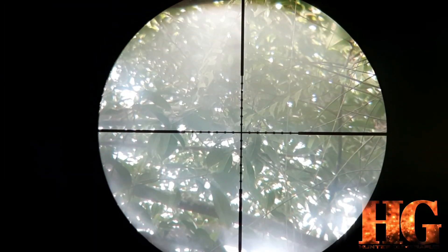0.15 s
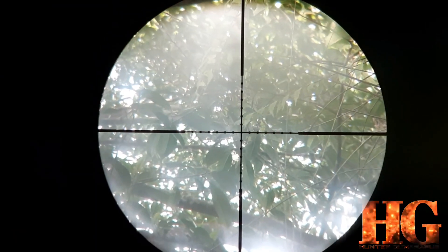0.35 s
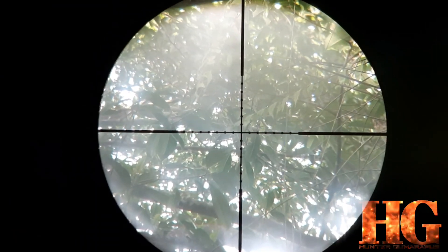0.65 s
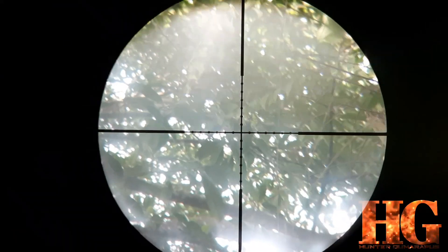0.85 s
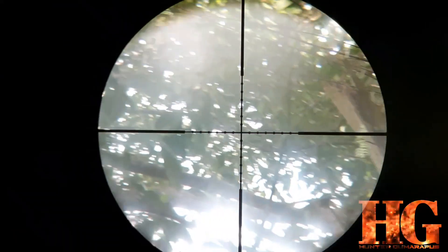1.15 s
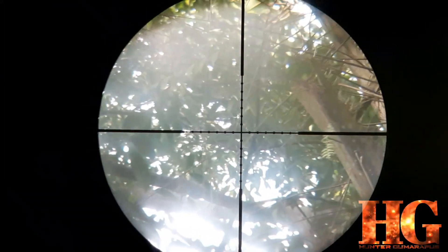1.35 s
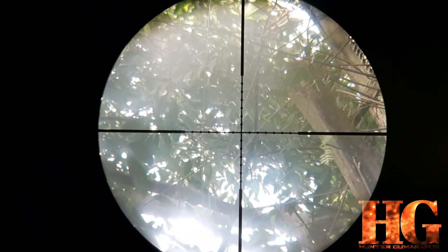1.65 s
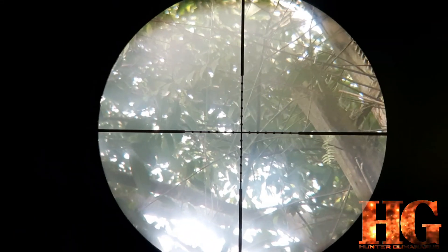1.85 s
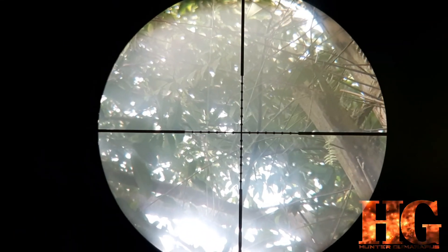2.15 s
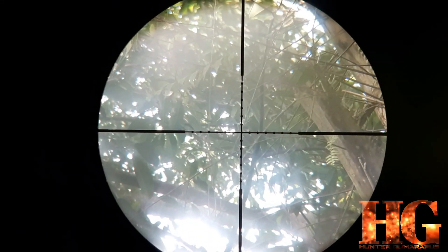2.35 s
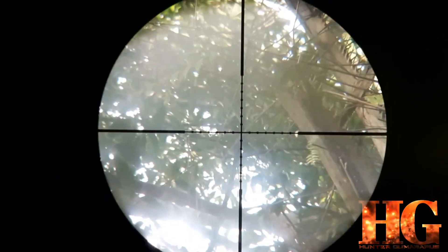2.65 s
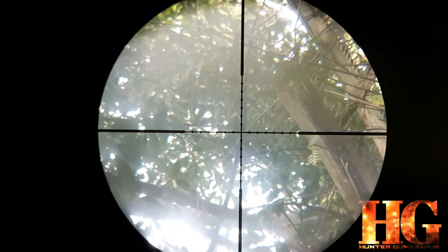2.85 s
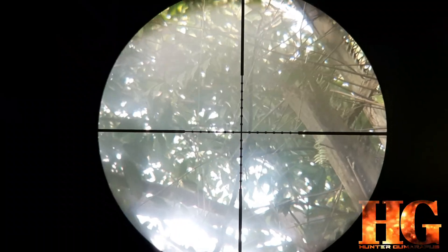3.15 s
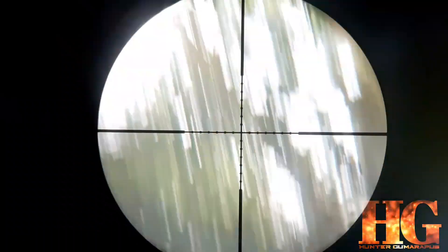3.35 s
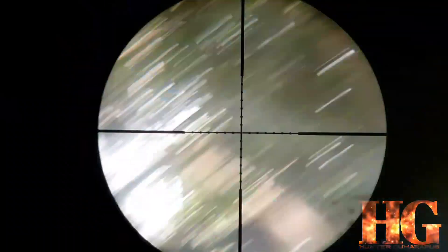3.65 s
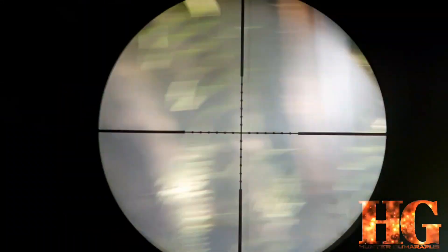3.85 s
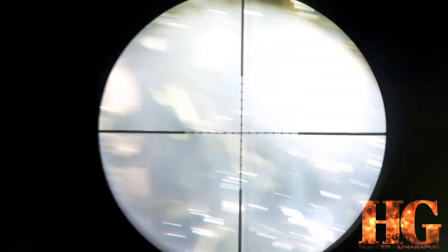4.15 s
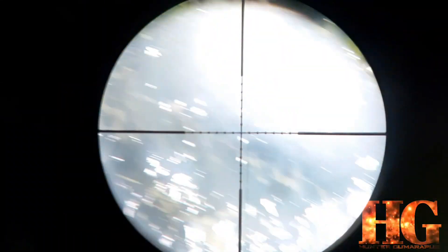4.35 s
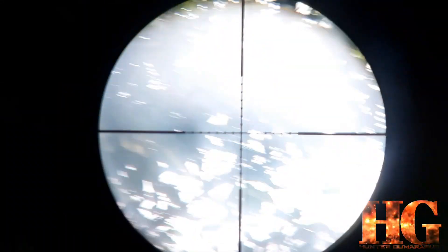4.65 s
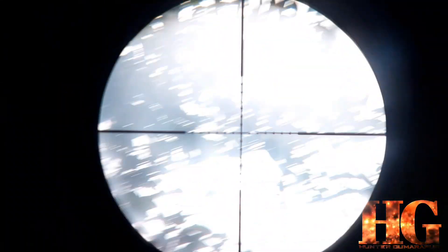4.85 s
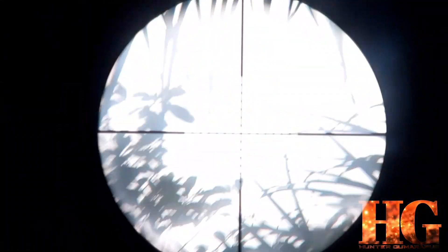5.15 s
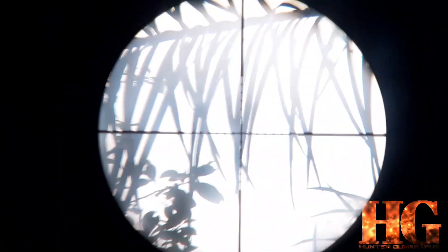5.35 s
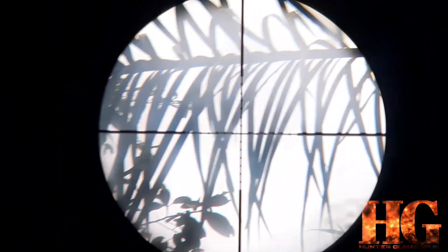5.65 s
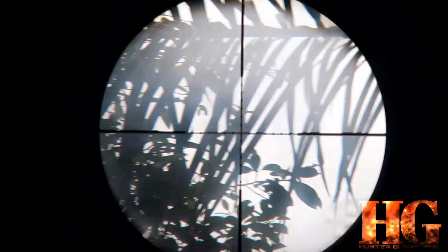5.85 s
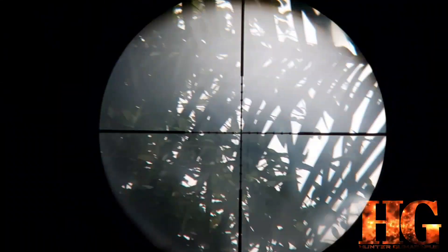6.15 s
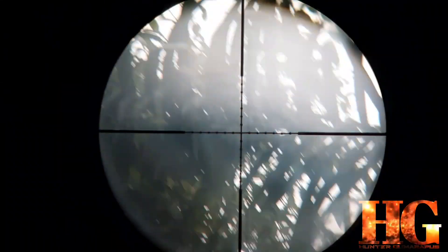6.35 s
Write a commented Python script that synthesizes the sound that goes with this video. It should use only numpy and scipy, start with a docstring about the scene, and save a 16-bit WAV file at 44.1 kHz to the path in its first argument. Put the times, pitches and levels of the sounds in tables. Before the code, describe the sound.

In breezy woods with droning insects and a whistling bird, an air rifle thumps, echoes through trees, then clatters as it is recocked.

```python
"""Insects drone and small birds call in a breezy wood; an air rifle thumps, echoes, then clatters as it is recocked.
A two-port microphone rides on the gun: the right port faces the action, the left lies in its shadow.
Air, insects and rubbing are shaped noise; birds are gliding tones; metal and wood are clicks that set modes ringing.
The shot is a noise blast with ringing parts, slow tube tones and a decaying noise echo.
The recorder turns its gain down on heavy bass, such as the jolt of the shot, and creeps back up."""
import sys
import numpy as np
from scipy import signal
from scipy.fft import rfft, irfft
from scipy.io import wavfile
from scipy.ndimage import uniform_filter1d

SR = 44100
rng = np.random.default_rng(int(sys.argv[2]) if len(sys.argv) > 2 else 0)


def wrap_up_sound(samples):
    """Save the sound to the file named by the first command line argument, as 16-bit audio."""
    columns = np.atleast_2d(samples).T
    # keep every value between -1 and 1, then stretch to whole-number steps
    tamed = np.clip(columns, -1, 1)
    steps = np.round(tamed * 32767).astype(np.int16)
    wavfile.write(sys.argv[1], SR, steps)


N = 287091
TIME = np.arange(N) / SR  # seconds
PORT_LAG = 21  # samples between the ports

# hammer on the valve and its bounces: (time [s], level [dB])
HAMMER = [(2.5715, -2), (2.5774, -11), (2.584, -14), (2.5885, -24)]


def amp(db):
    """Turn a level in dB into a gain."""
    return 10 ** (np.asarray(db) / 20)


def rms_one(x):
    """Scale to an average strength (rms) of 1."""
    return x / np.sqrt(np.mean(x ** 2) + 1e-20)


def curve(rows, column=1):
    """Join the points of a table column by straight lines along time."""
    points = np.array(rows)
    return np.interp(TIME, points[:, 0], points[:, column])


def at_bins(rows, column=1):
    """Spread a table column over the FFT bins, on a log-frequency axis."""
    hz = np.fft.rfftfreq(N, 1 / SR) + 1  # the 1 avoids log(0)
    points = np.array(rows)
    return np.interp(np.log(hz), np.log(points[:, 0]), points[:, column])


def noise(colour, channels=1):
    """Shape white noise to a given spectrum, at rms 1."""
    spectrum = rfft(rng.standard_normal((channels, N)))
    return rms_one(irfft(spectrum * amp(at_bins(colour)), N))


def drift(rate):
    """Wander at random through `rate` new values a second, each drawn with spread 1."""
    knots = rng.standard_normal(400)
    return np.interp(TIME * rate, np.arange(400), knots)


def swells(rows):
    """Add up envelopes that rise, hold and fall."""
    edge_db = 40  # range that a swell climbs and falls
    total = np.zeros(N)
    for start_s, rise, hold, fall, db in rows:
        times = start_s + np.cumsum([0, abs(rise), abs(hold), abs(fall)])
        levels = db - edge_db * np.array([1, 0, 0, 1])
        total += amp(np.interp(TIME, times, levels, left=-200, right=-200))
    return total


def ring(x, hz, t60):
    """A unit click sets a sine of height about 1 ringing; it dies by 60 dB in t60 seconds."""
    r = amp(-60 / (max(t60, .001) * SR))  # loss per sample
    w = 2 * np.pi * hz / SR
    return signal.lfilter([0, np.sin(w)], [1, -2 * r * np.cos(w), r * r], x + 1e-18)


def dying(start_s, db, t60, rise_s):
    """Envelope that rises smoothly from silence and dies away."""
    t = np.maximum(TIME - start_s, 0)
    return amp(db - 60 * t / t60) * (1 - np.exp(-t / rise_s))


def near(x, left_db=-3., cavity_db=-30., scatter_db=-6.):
    """A source on the gun: direct at the right port; at the left late, dull, scattered and with a cavity ring."""
    late = np.concatenate([np.zeros(PORT_LAG), x[:-PORT_LAG]])
    # ways round the shooter and the scope
    paths = rng.standard_normal((2, 800)) * amp(-60 * TIME[:800] / .025)
    first, second = (np.convolve(late, path / np.sqrt(np.sum(path ** 2)))[:N] for path in paths)
    turn = 2 * drift(40)  # the mix of paths wanders as the gun moves
    both = late + amp(scatter_db) * (np.cos(turn) * first + np.sin(turn) * second)
    shaded = signal.lfilter(*signal.butter(1, 1500, fs=SR), both) + amp(-19.0) * both
    left = signal.lfilter(*signal.iirnotch(8700, 2.6, SR), amp(left_db) * shaded)
    cavity = amp(cavity_db) * ring(late, 1080, 0.016)
    return np.array([left + cavity, x])


def breeze_air():
    """Air noise, partly alike at the two ports, whose rumble and leaf hiss swell with the breeze."""
    # steady air: (frequency [Hz], left [dB per Hz], right [dB per Hz], left-right likeness [-1 to 1])
    air_spectrum = [(29, -105, -104, 0.99), (62.3, -92.5, -94, 0.73), (130, -81.5, -78, 1),
                    (130, -83.5, -81, 1), (211, -96.5, -94, 0.47), (290, -95, -92, 0.76),
                    (461, -103, -101, -0.1), (820, -99, -94.5, 0.043), (1240, -101, -101, -0.54),
                    (1720, -108, -103, 0.5), (3000, -107, -103, -0.26), (6100, -121, -109, 0.45),
                    (15000, -124, -119, 0.47)]
    # breeze: (time [s], rumble swell [dB], leaf hiss swell [dB])
    breeze = [(0, 0.5, -1), (.3, -5.5, -1.5), (.6, 3.5, 0), (2.4, 4.5, -0.5), (3.5, 4, 2), (4.4, 6.5, 1),
              (4.8, 9.5, 2.5), (5.5, 3.5, 3.5), (6.2, 4.5, 0.5), (6.51, -2.5, -6)]
    common, apart = rfft(rng.standard_normal((2, N)))
    alike = np.clip(at_bins(air_spectrum, column=3), -1, 1)
    pair = np.sqrt(1 + alike) * common + np.sqrt(1 - alike) * apart * [[1], [-1]]
    pair = pair * np.sqrt(SR / 4)  # makes the table levels hold per Hz
    levels_db = [at_bins(air_spectrum, column=1), at_bins(air_spectrum, column=2)]
    air = irfft(pair * amp(levels_db), N)
    rumble = signal.sosfilt(signal.butter(2, 380, fs=SR, output="sos"), air)
    leaves = air - rumble
    rumble_gain = amp(curve(breeze) + 2.5 * drift(14))
    leaf_gain = amp(curve(breeze, column=2) + .8 * drift(9))
    return rumble * rumble_gain + leaves * leaf_gain


def insects():
    """Insects drone as narrow bands of noise that waver slightly in level."""
    # drones: (centre [Hz], width [Hz], left level [dB], right level [dB])
    drones = [(4604, 510, -73.5, -73.5), (7550, 600, -88.5, -66.5), (8900, 610, -99.5, -79),
              (10700, 1900, -85, -80)]
    out = np.zeros((2, N))
    for hz, width_hz, left_db, right_db in drones:
        edges = [hz - width_hz / 2, hz + width_hz / 2]
        band = signal.butter(2, edges, "band", fs=SR, output="sos")
        drone = rms_one(signal.sosfilt(band, rng.standard_normal((2, N))))
        out += drone * amp([[left_db], [right_db]]) * amp(0.76 * drift(28))
    return out


def rubbing():
    """The stock drags through the hands as the aim moves: coloured noise with an uneven level."""
    # drags: (time [s], rise [s], hold [s], fall [s], level [dB])
    drags = [(.4, 0.28, .3, .1, -66.5), (.95, 0.16, 0.21, 0.46, -65.5), (3.4, 0.068, 0.447, 0.043, -54.5)]
    # colour: (frequency [Hz], relative level [dB per Hz])
    rub_colour = [(150, -12), (300, -2), (680, -7), (810, 4), (940, -2), (1200, -3), (1350, -16),
                  (8000, -35)]
    return noise(rub_colour, channels=2) * swells(drags) * amp(3.0 * drift(24.05))


def birds(t60=0.72):
    """Birds whistle gliding tones; the trees smear each into a tail."""
    # three-note phrase: (time from last note [s], length [s], from [Hz], to [Hz], relative level [dB])
    phrase = [(-.164, .027, 2550, 2908, -11), (-.036, .024, 3072, 3312, -4.5), (0, .052, 4600, 3690, 0)]
    # phrases: (time of last note [s], level [dB], extra level of opening note [dB])
    phrases = [(0.876, -55, 7), (1.359, -58, 8), (1.85, -59.5, 10.5), (2.42, -58, 5), (2.985, -61, -1),
               (3.589, -57.5, -15), (4.43, -57, 3), (5.437, -59, 0)]
    # other birds: (time [s], length [s], from [Hz], to [Hz], level [dB])
    chirps = [(4.207, 0.03, 2150, 2025, -63), (5.046, 0.078, 5400, 5480, -77),
              (5.296, 0.04, 5540, 5500, -68), (6.422, 0.0275, 2800, 1930, -67.5),
              (6.475, 0.032, 2020, 3000, -65.5)]
    notes = list(chirps)
    for s, level, opening in phrases:
        for k, (at, length, from_hz, to_hz, db) in enumerate(phrase):
            notes.append((s + at, length, from_hz, to_hz, db + level + opening * (k == 0)))
    dry = np.zeros(N + SR)
    for s, length, from_hz, to_hz, db in notes:
        u = np.linspace(0, 1, int(length * SR))  # progress through the note
        hz = to_hz + (from_hz - to_hz) * (1 - u) ** 2.8  # the glide levels off
        husk_db = np.interp(u, np.linspace(0, 1, 16), rng.normal(0, 3, 16))  # husky flutter
        waver = np.interp(u, np.linspace(0, 1, 8), rng.normal(0, .012, 8))
        hz *= rng.normal(1, .006) + waver  # no two notes alike
        envelope = amp(db + husk_db) * np.sqrt(np.sin(np.pi * u ** .7))
        dry[int(s * SR):][:len(u)] += envelope * np.sin(2 * np.pi * np.cumsum(hz) / SR)
    t = TIME[:SR // 2]
    trees = rng.standard_normal((2, len(t))) * amp(-60 * t / t60)
    trees = trees / np.sqrt(np.sum(trees ** 2, axis=1, keepdims=True))
    tail = signal.fftconvolve(dry[None, :N], trees)[:, :N]
    # moving leaves blur the pitch of the tail
    flutter = rms_one(uniform_filter1d(rng.standard_normal((2, N)), 150))
    return dry[:N] + amp(2.5) * tail * (.87 + .5 * flutter)


def knocks():
    """Soft blows set the stock ringing dully, felt at both ports."""
    # blows: (time [s], level [dB], contact cut-off [Hz])
    blows = [(1.617, -47, 380), (2.767, -54, 500), (3.332, -42, 1500), (3.472, -41, 400),
             (4.712, -39.5, 1386), (5.233, -38.5, 1390), (5.295, -32, 1400), (5.459, -43.5, 1405),
             (5.644, -45.5, 1400), (5.719, -42, 1400), (5.833, -40, 1430)]
    # stock modes: (frequency [Hz], level [dB], t60 [s])
    stock = [(164, -17, 0.1), (301.4, -2.5, 0.1), (418, -0.5, 0.029), (600, -11.5, 0.016), (990, 5, 0.023)]
    out, click = np.zeros(N + SR), np.eye(1, SR // 6)[0]
    for s, db, cut_hz in blows:
        # a soft contact rounds the click
        blow = signal.sosfilt(signal.butter(4, cut_hz, fs=SR, output="sos"), click)
        for hz, level_db, t60 in stock:
            gain = amp(db + level_db + rng.normal(0, 3.5))
            out[int(s * SR):][:len(click)] += gain * ring(blow, hz, t60)
    out = signal.lfilter(*signal.butter(2, 130, "high", fs=SR), out[:N])
    return np.array([amp(3.5) * np.roll(out, 3 * PORT_LAG), out])


def shot():
    """Noise blast and hammer blows ring the gun body, and recoil thumps the right port as dying sines."""
    # sear tick, valve crack and outflow: (time [s], rise [s], hold [s], fall [s], level [dB])
    blast_swells = [(2.5603, 0.00033, 0.00055, 0.0032, -30.5), (2.565, 0.0071, 0.00028, 0.017, -16),
                    (2.5655, 0.0028, 0.02, 0.025, -24)]
    # blast colour: (frequency [Hz], relative level [dB per Hz])
    blast_colour = [(200, -7.5), (800, -12.5), (1500, -1), (3400, -10.5), (6000, -10.5), (8700, -19),
                    (12300, -10.5), (15500, -15)]
    # gun body modes: (frequency [Hz], level [dB], t60 [s])
    body_modes = [(902, -1.5, 0.023), (11200, -25.5, 0.047)]
    # recoil through the mount: (time [s], level [dB], frequency [Hz], t60 [s])
    jolts = [(2.5745, -12, 101, 0.079), (2.5744, -15.5, 170, 0.037), (2.5774, -12, 286, 0.036),
             (2.601, -23.5, 69.5, 0.12)]
    blows, jolt = np.zeros(N), np.zeros(N)
    for s, db in HAMMER:
        blows[int(s * SR)] = amp(db)
    body = sum(amp(db) * ring(blows, hz, t60) for hz, db, t60 in body_modes)
    for s, db, hz, t60 in jolts:
        t = np.maximum(TIME - s, 0)
        jolt += amp(db - 60 * t / t60) * np.sin(2 * np.pi * hz * t)
    blast = noise(blast_colour)[0] * swells(blast_swells)
    shaded = near(body + blast, left_db=-5.5, cavity_db=-35.0, scatter_db=-6.)[0]
    # the recoil does not reach the left port, which hears little bass
    airborne = signal.lfilter(*signal.butter(2, 450, "high", fs=SR), shaded)
    return np.array([airborne, body + blast + jolt])


def tube():
    """Long modes of air tube and barrel, fed slowly from the action, swell, settle in pitch, waver and die."""
    # modes: (from [Hz], resting [Hz], left level [dB], right level [dB], t60 [s], swell [s])
    long_modes = [(775, 759, -33, -25, .76, .065), (780, 985, -35, -38, .35, .04),
                  (2202, 2202, -35, -24.5, .36, .055)]
    settle_s = .045  # time constant of the slide to the resting pitch
    out, start = 0, HAMMER[0][0]
    for from_hz, hz, left_db, right_db, t60, swell in long_modes:
        pitch = hz + (from_hz - hz) * np.exp(-np.maximum(TIME - start, 0) / settle_s)
        # two rises multiplied make a gentler start
        envelope = dying(start, 1.0 * drift(60), t60, swell) * dying(start, 0, np.inf, swell)
        tone = np.sin(2 * np.pi * np.cumsum(pitch) / SR)
        out = out + amp([[left_db], [right_db]]) * envelope * tone
    return out


def echo_and_strike():
    """Trees scatter the shot back and the pellet hits a far branch: two dying washes of noise."""
    # shot scattered by the trees: (time [s], level [dB], t60 [s])
    echo = (2.572, -34.5, 0.87)
    # pellet on the branch: (time [s], level [dB], t60 [s])
    strike = (2.766, -34.5, 0.8)
    # colours: (frequency [Hz], relative level [dB per Hz])
    echo_colour, strike_colour = [(300, -14), (1200, -6), (3400, -1), (6000, 0.5), (8700, -9.5),
                                  (12000, -2), (15500, -9)], [(300, -26.5), (1500, -13), (3400, -2.5), (5500, 1),
                                                       (7500, -4.5), (9000, -15), (15500, -17.5)]
    far = noise(echo_colour, channels=2) * dying(*echo, 0.0045)
    # the direct sound leads its scatter
    crack = amp(6 * np.exp(-abs(TIME - strike[0]) / .008))
    far += noise(strike_colour, channels=2) * dying(*strike, .002) * crack * amp(1.5 * drift(55))
    # the left port hears it duller, with a wide notch
    dull = signal.lfilter(*signal.butter(1, 3500, fs=SR), far[0])
    far[0] = amp(6.5) * signal.lfilter(*signal.iirnotch(8700, .55, SR), dull)
    return far


def brushed_leaves():
    """Dry leaves brushed in passing swish as swells of coloured noise."""
    # swishes: (time [s], rise [s], hold [s], fall [s], level [dB])
    swishes = [(3.27, 0.202, 0.056, .03, -56), (3.294, 0.4, 0.017, 1.85, -64),
               (3.51, 1.33, 0.23, 0.42, -65.5)]
    # colour: (frequency [Hz], relative level [dB per Hz])
    swish_colour = [(900, -23), (1400, 0), (2800, 4), (3200, -5), (12000, -22)]
    return noise(swish_colour, channels=2) * swells(swishes)


def cocking(split_hz=3500, raw_db=12.0):
    """Each metal contact is a chatter of uneven clicks that rings the action; bright ones favour the high modes."""
    # bolt and lever: (time [s], level [dB], chatter length [ms], brightness [dB])
    contacts = [(4.0192, -43.5, 4.9, -2.5), (4.328, -37, 1.55, -2), (4.4143, -47, 3, -28),
                (4.69, -23, 5.7, -2), (4.705, -20.5, 3.8, -12), (4.7101, -11.5, 3.8, 33),
                (4.7149, -17.5, 4.3, -2), (4.7278, -19.5, 2.6, 13), (4.7317, -27, 1.4, 13),
                (4.7361, -22.5, 2.8, 16), (4.749, -38, 0.89, 10), (4.7515, -37, 1.1, 14),
                (4.7688, -36.5, 2.4, 4), (4.782, -43.5, 2, 9), (4.838, -34.5, 1.46, -40),
                (4.856, -40.5, 7.5, -1), (5.203, -11.5, 6.4, 10), (5.2075, -8, 2.2, 43),
                (5.214, -22, 2.2, -8), (5.229, -25, 4.5, 5), (5.233, -20, 4.1, -16),
                (5.2413, -22.5, 3.3, 5), (5.2522, -26, 2.5, -12), (5.2574, -23.5, 2.4, 14),
                (5.264, -30, 1, 8), (5.2747, -25, 1.3, 3), (5.2776, -21, 5, -13), (5.29, -9.5, 0.73, 22),
                (5.2925, -22, 3, 21), (5.447, -33.5, 7.2, 8), (5.4538, -26.5, 3.2, 21),
                (5.584, -42, 4.3, -16), (5.6319, -28.5, 1.7, -12), (5.641, -23.5, 3.9, -46),
                (5.6477, -30.5, 2.6, -26), (5.6838, -32, 1, 4), (5.6757, -40, 2.2, 5), (5.6878, -26, 5, 10),
                (5.696, -19, 2.22, -38), (5.705, -33, 1.8, -10), (5.721, -30.5, 2.1, -15),
                (5.732, -28, 1.4, -2), (5.7465, -27.5, 3.1, 10), (5.7522, -22.5, 0.35, 32),
                (5.763, -33.5, 1.2, 7), (5.828, -24, 3.3, -15), (5.982, -45, 1.94, -36)]
    # bolt and receiver modes: (frequency [Hz], level [dB], t60 [s])
    action = [(960, 3, 0.0092), (1530, 3, 0.012), (1750, 7.5, 0.015), (2150, 6.5, 0.011),
              (2800, 11, 0.0048), (4337, 10, 0.019), (5500, 4.5, 0.0026), (7010, 16.5, 0.0026),
              (11200, -4, 0.0014), (12700, 2, 0.0052), (13800, 7, 0.00101)]
    out, t = np.zeros(N + SR), TIME[:SR // 12]
    low = signal.butter(1, split_hz, fs=SR)
    for s, db, length_ms, bright_db in contacts + slips():
        span = max(length_ms, .3) / 1000
        chatter = rng.standard_normal(len(t)) * amp(6 * rng.standard_normal(len(t)))
        chatter *= np.minimum(t / (.1 * span), 1) * np.exp(-np.maximum(t - .5 * span, 0) / (.75 * span))
        # the parts shift, so each contact rings a little differently
        strengths_db, shifts = rng.normal(0, 3.5, len(action)), rng.normal(1, .03, len(action))
        dull = signal.lfilter(*low, chatter)
        sound = amp(raw_db) * (amp(-.5 * bright_db) * dull + amp(.5 * bright_db) * (chatter - dull))
        for (hz, level, t60), strength_db, shift in zip(action, strengths_db, shifts):
            lean_db = .5 * bright_db * np.tanh(2 * np.log(hz / split_hz))
            gain = amp(level + lean_db + strength_db) / np.sqrt(t60 * SR / 14)  # evens out long and short rings
            sound += gain * ring(chatter, hz * shift, t60)
        loudest = np.sqrt(uniform_filter1d(sound ** 2, 88).max())  # over 2 ms
        out[int(s * SR):][:len(t)] += amp(db) * sound / loudest
    # small parts give no bass
    thin = signal.sosfilt(signal.butter(4, 850, "high", fs=SR, output="sos"), out[:N])
    # a shallow dip between the modes
    thin = .55 * thin + .45 * signal.lfilter(*signal.iirnotch(8900, 2.5, SR), thin)
    # a gap under the main clack
    thin = signal.lfilter(*signal.iirnotch(1190, 3., SR), thin)
    return near(thin, left_db=-9., cavity_db=-58.0, scatter_db=3.0)


def slips():
    """The bolt sticks and slips in its guides: uneven small contacts, in the columns of the contacts."""
    # slides: (from [s], to [s], level at start [dB], level at end [dB], brightness [dB])
    slides = [(4.721, 4.778, -35.5, -51.5, 10), (5.211, 5.302, -31, -39, -12),
              (5.661, 5.769, -41, -44.5, -5)]
    slips_per_s, slip_ms = 340, 2.9  # step rate, typical chatter length
    level_spread_db, bright_spread_db = 4, 10
    rows = []
    for start, end, from_db, to_db, bright_db in slides:
        draws = rng.standard_normal((40, 4))
        for k, (timing, loudness, length, brightness) in enumerate(draws):
            s = start + (k + .5 + .5 * np.tanh(timing)) / slips_per_s
            if s < end:
                db = from_db + (to_db - from_db) * (s - start) / (end - start)
                rows.append((s, db + level_spread_db * loudness, slip_ms * amp(3.6 * length),
                             bright_db + bright_spread_db * brightness))
    return rows


def scene():
    """Add up all sources at the two ports."""
    surroundings = breeze_air() + insects() + birds() * amp([[0.], [-1.]])
    handling = rubbing() + knocks() + brushed_leaves() + cocking()
    return surroundings + handling + shot() + tube() + echo_and_strike()


def record(dry, start_db=-41.5, depth_db=11.0, back_db_per_s=11.0, attack_s=0.26):
    """Heavy bass at the right port slowly turns the gain down, and it climbs back; peaks are rounded, the top is cut."""
    bass = signal.sosfilt(signal.butter(2, 200, fs=SR, output="sos"), dry[1])
    level_db = 10 * np.log10(uniform_filter1d(bass ** 2, 2000) + 1e-12)
    # remember the loudest bass, letting it fade at a steady rate
    fade_db = back_db_per_s * TIME
    held_db = np.maximum.accumulate(level_db + fade_db) - fade_db
    cut_db = np.clip(held_db - start_db, 0, depth_db)
    r = np.exp(-1 / (attack_s * SR))
    smooth_cut_db = signal.lfilter([1 - r], [1, -r], cut_db)
    out = signal.sosfilt(signal.butter(3, 50, "high", fs=SR, output="sos"), dry) * amp(-smooth_cut_db)
    rounded = 1.1 * np.tanh(out / 1.1)
    return signal.sosfilt(signal.cheby2(16, 90, 17000, fs=SR, output="sos"), rounded)  # 90 dB down from 17 kHz


dry = scene()
out = record(dry)
wrap_up_sound(out)
```